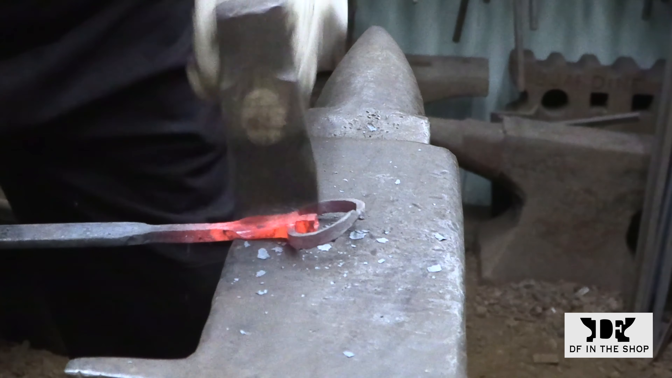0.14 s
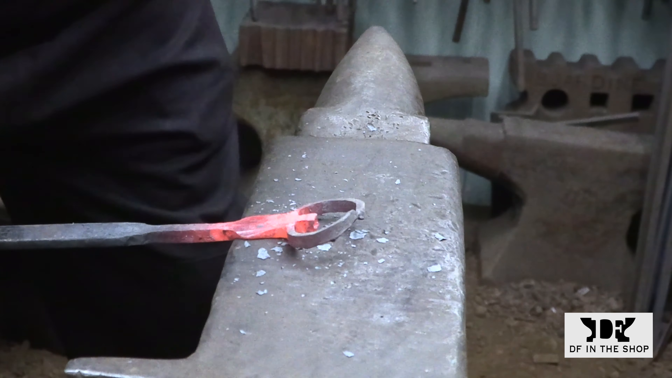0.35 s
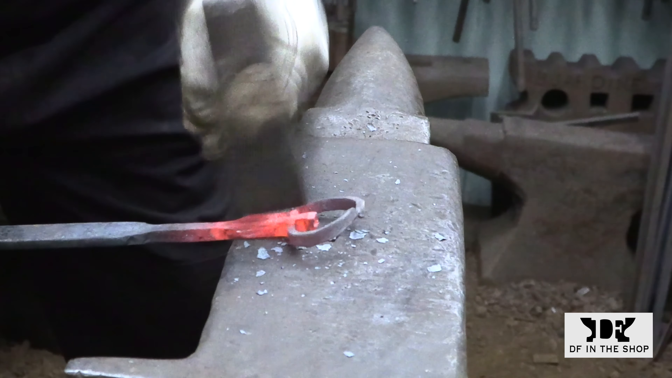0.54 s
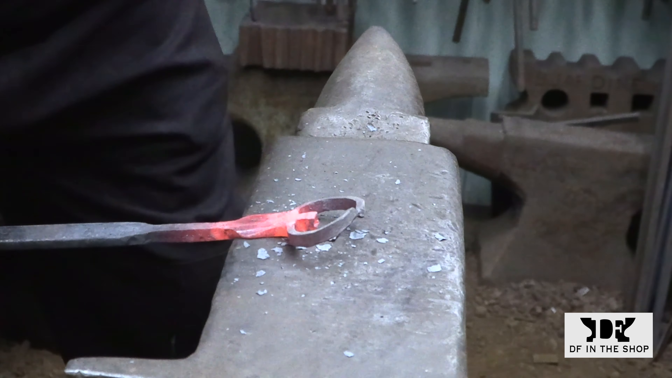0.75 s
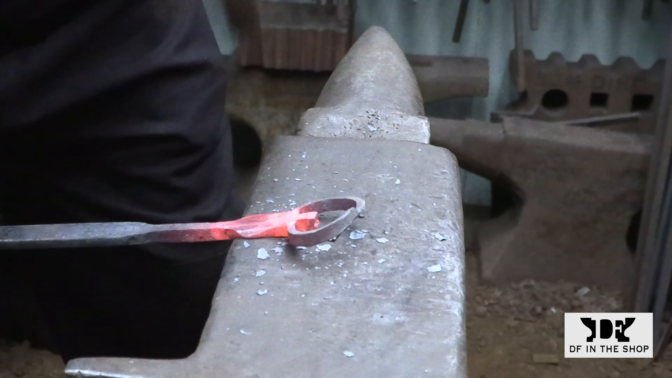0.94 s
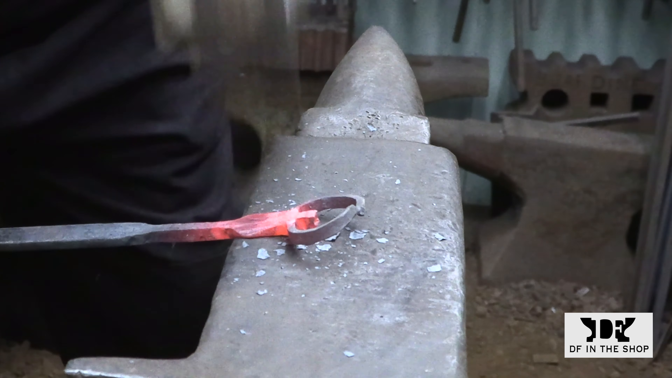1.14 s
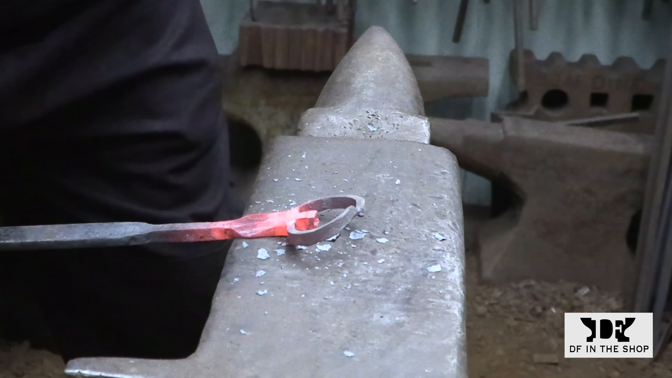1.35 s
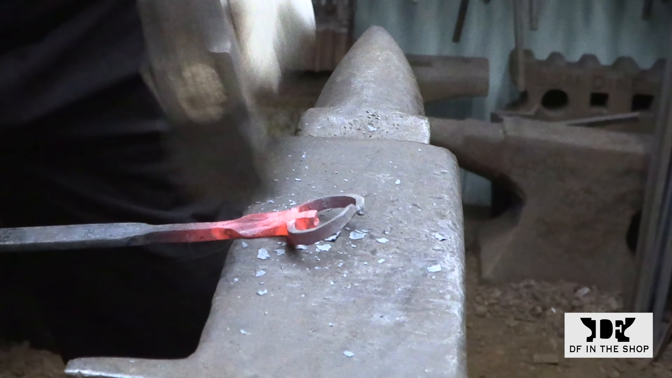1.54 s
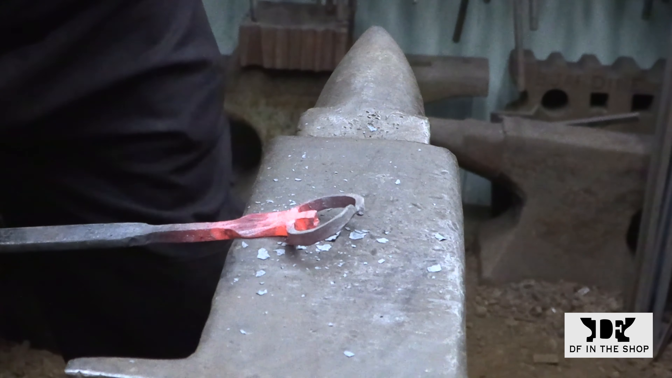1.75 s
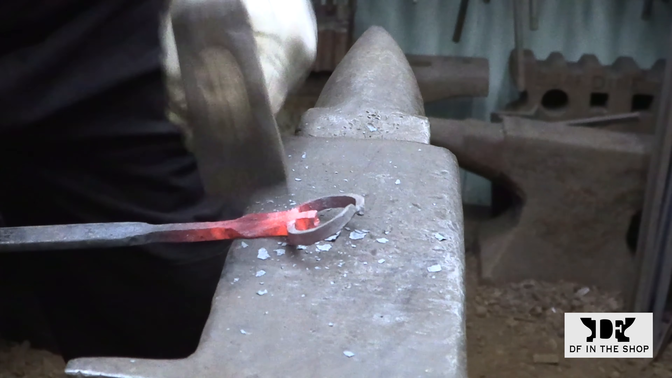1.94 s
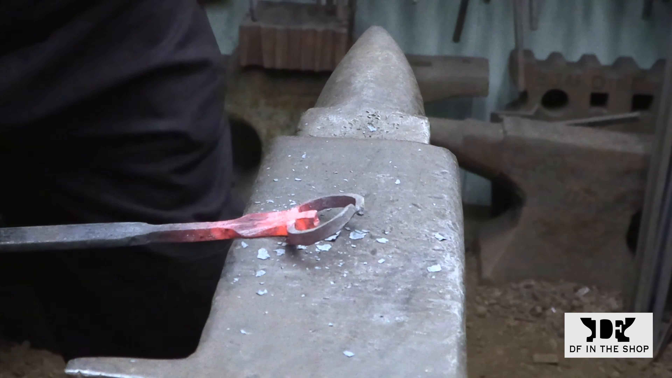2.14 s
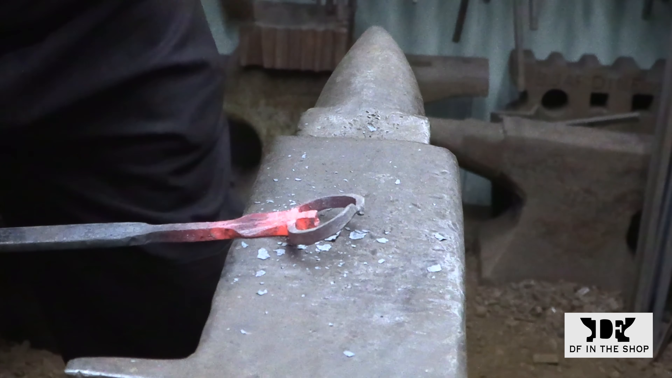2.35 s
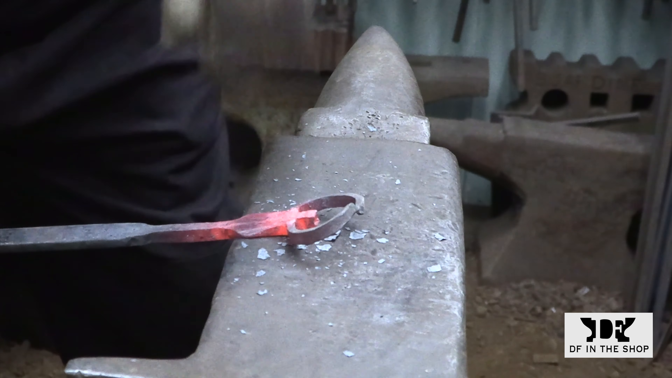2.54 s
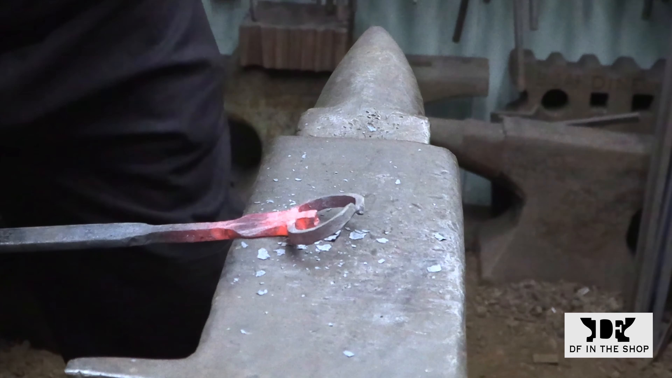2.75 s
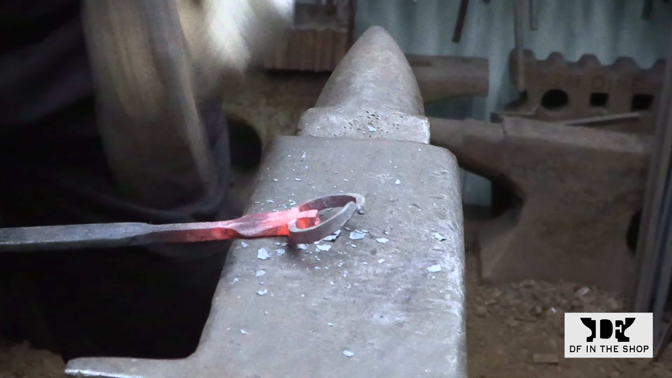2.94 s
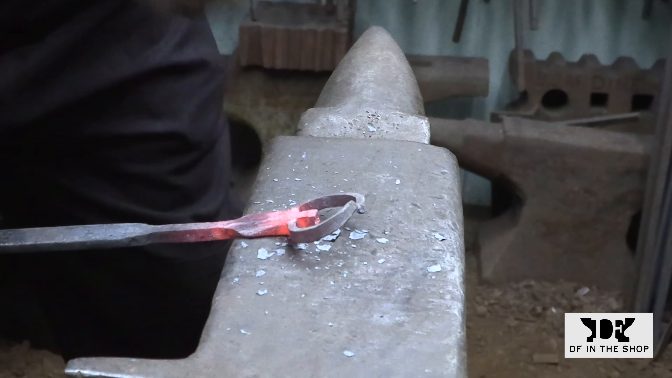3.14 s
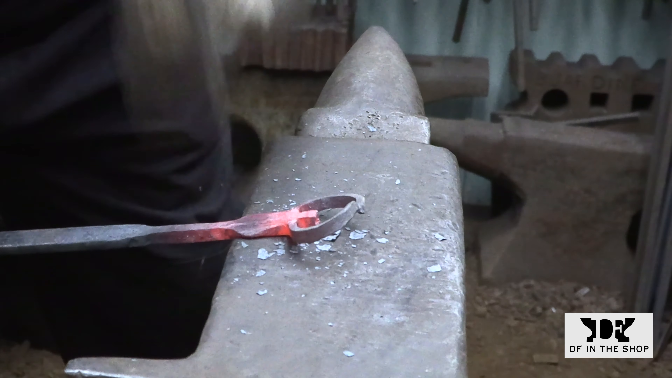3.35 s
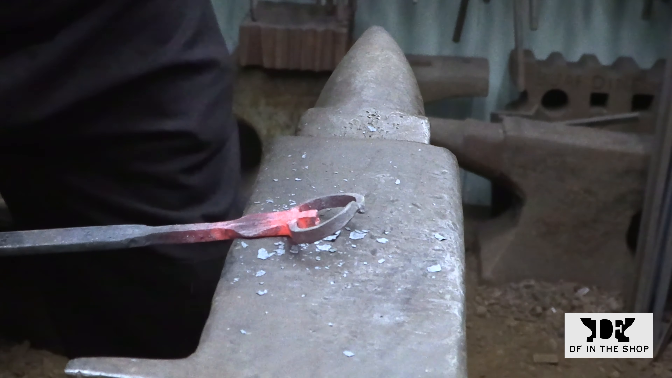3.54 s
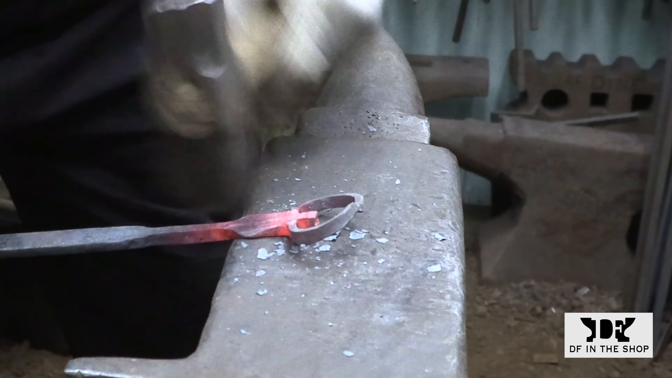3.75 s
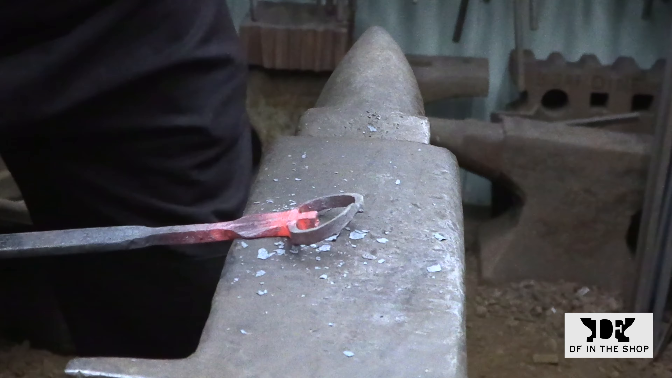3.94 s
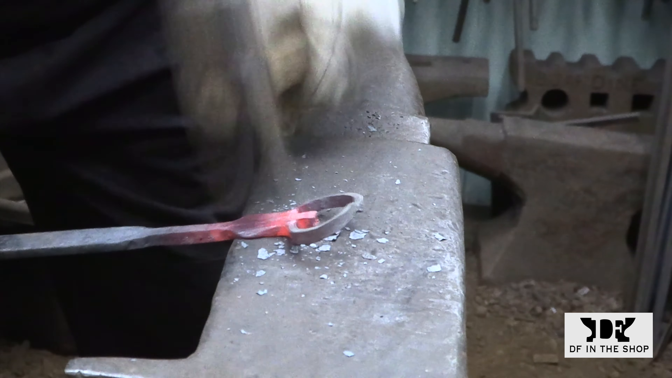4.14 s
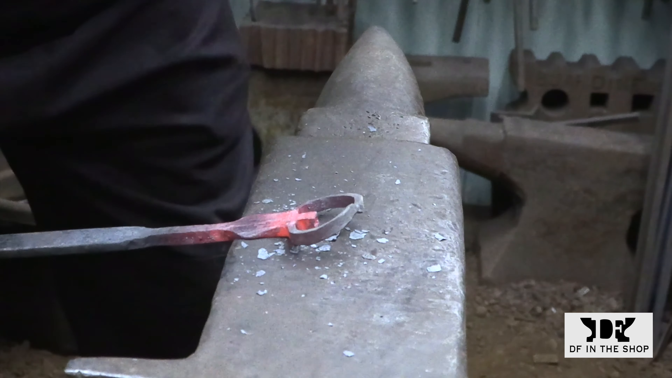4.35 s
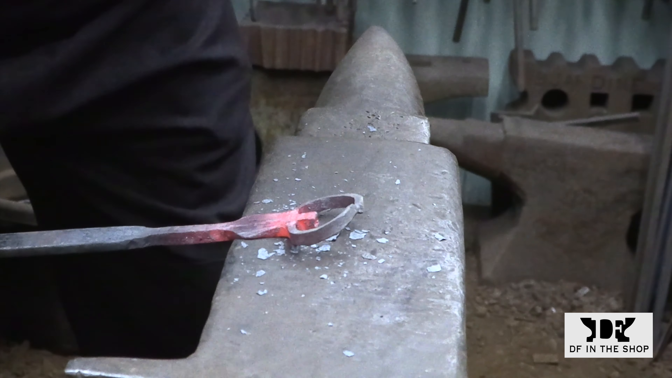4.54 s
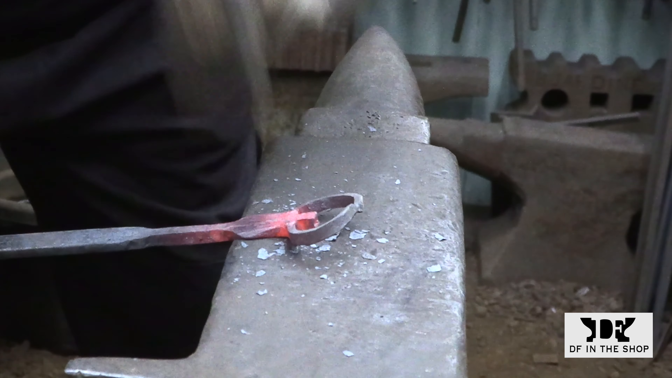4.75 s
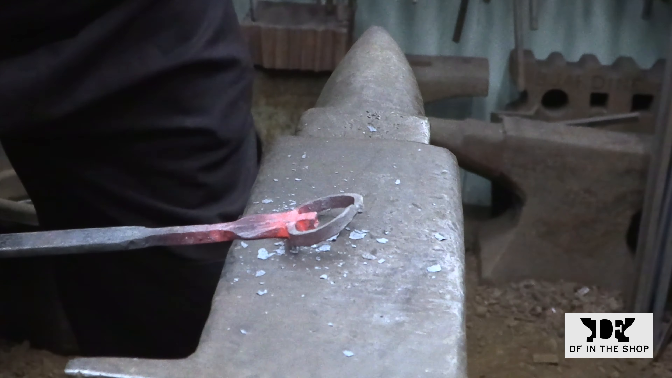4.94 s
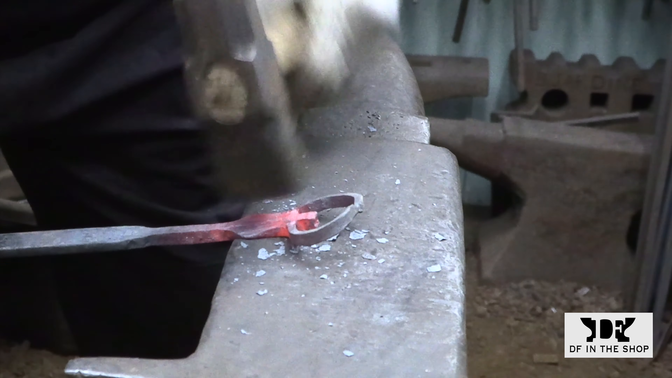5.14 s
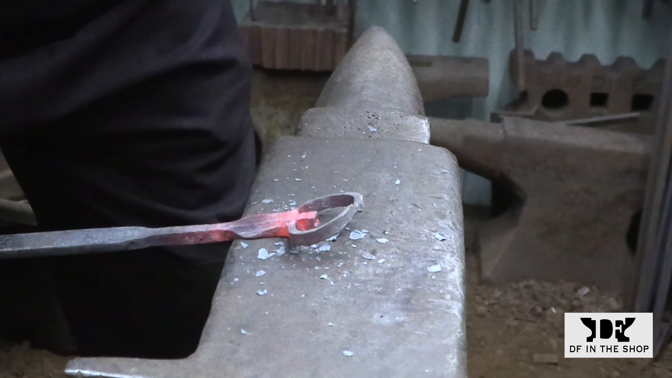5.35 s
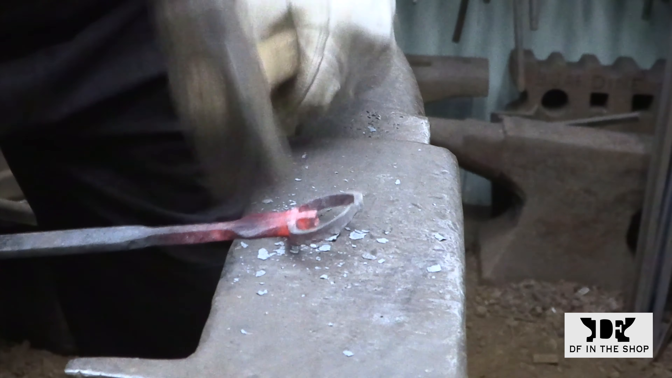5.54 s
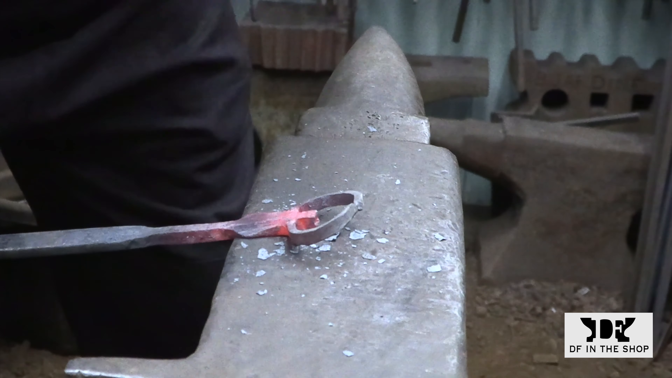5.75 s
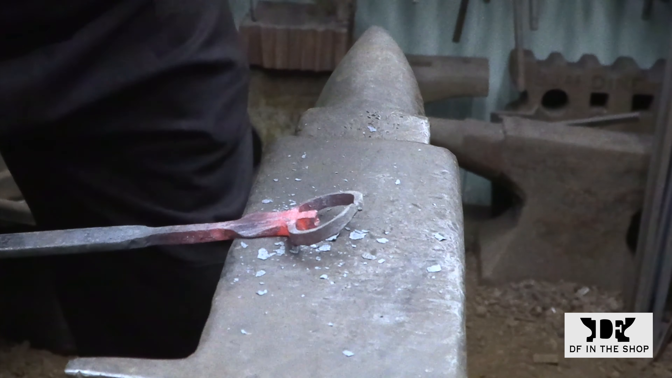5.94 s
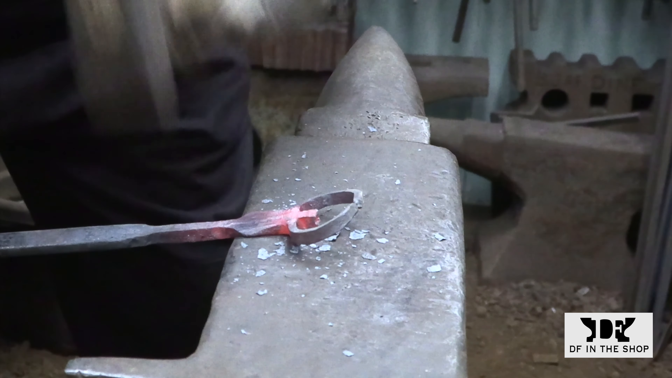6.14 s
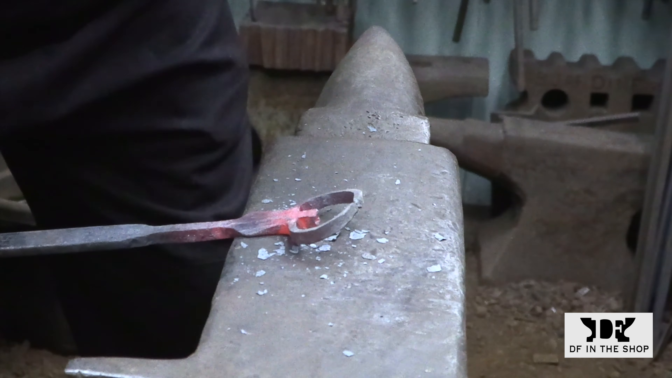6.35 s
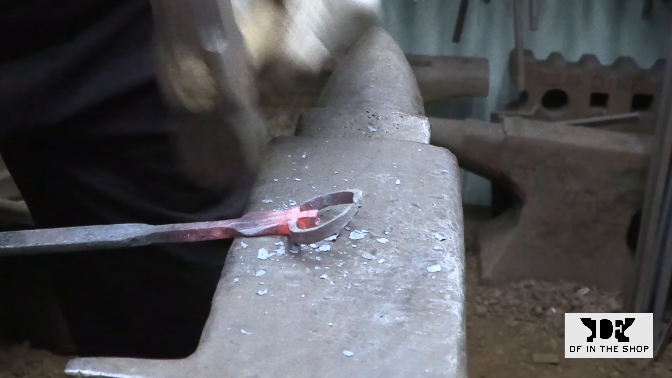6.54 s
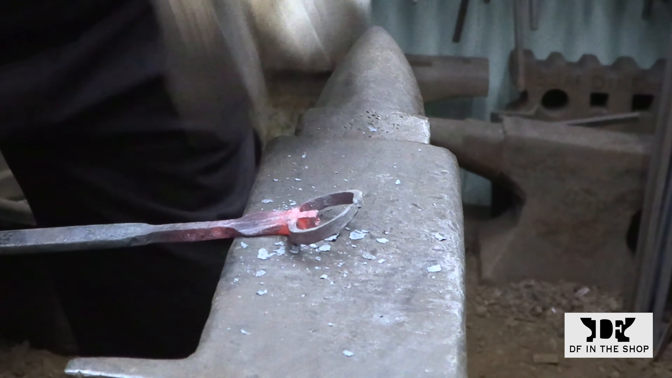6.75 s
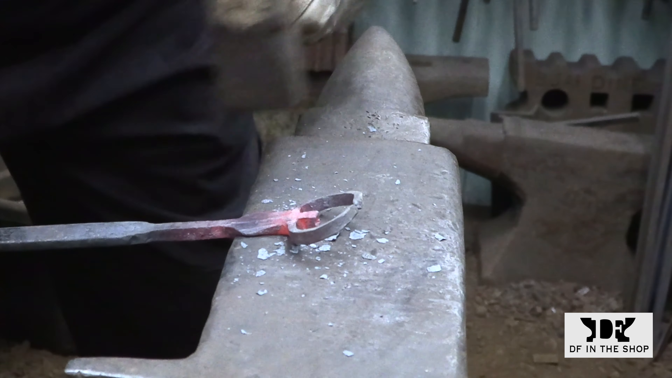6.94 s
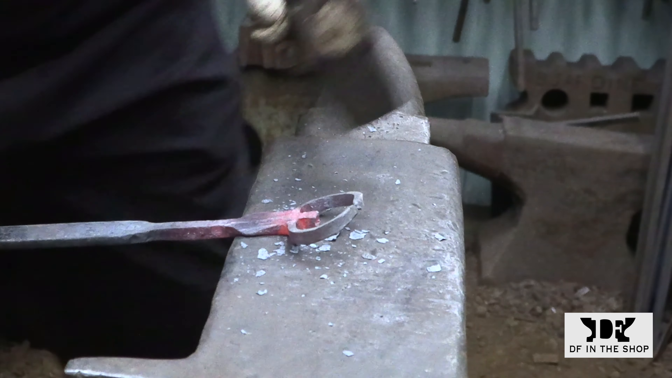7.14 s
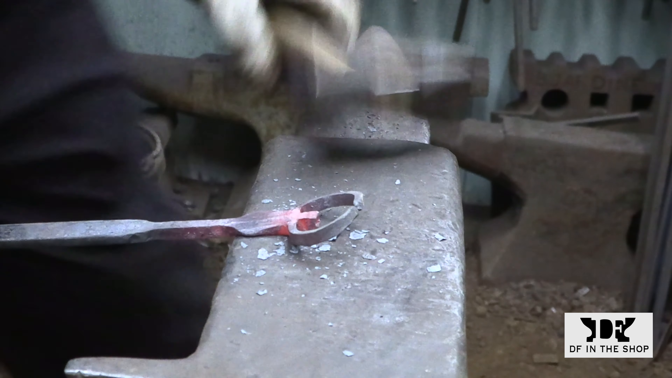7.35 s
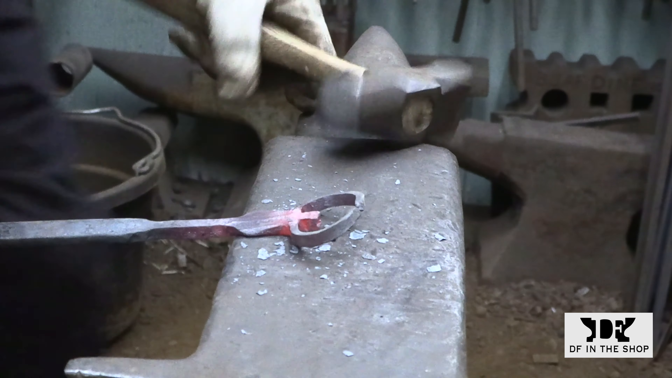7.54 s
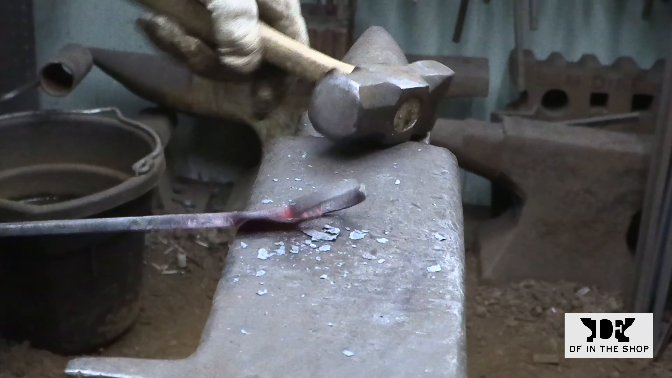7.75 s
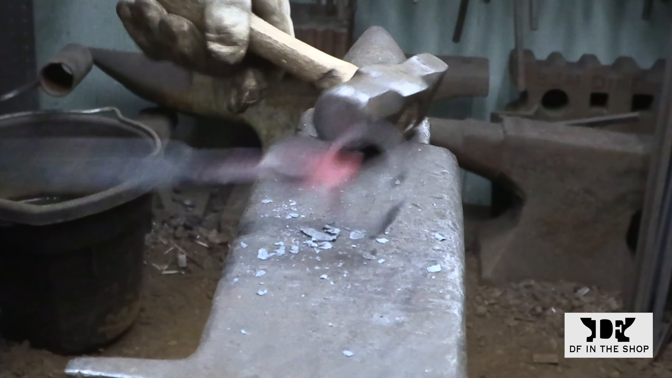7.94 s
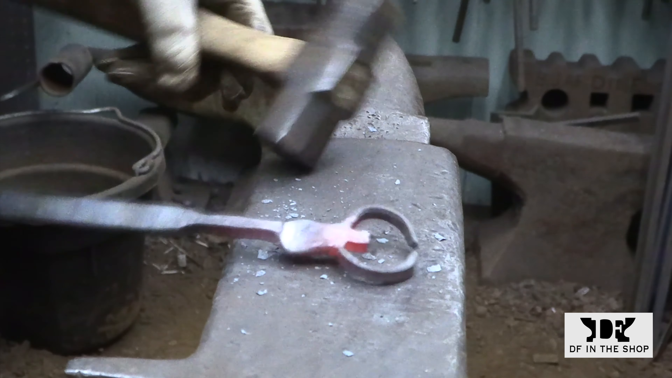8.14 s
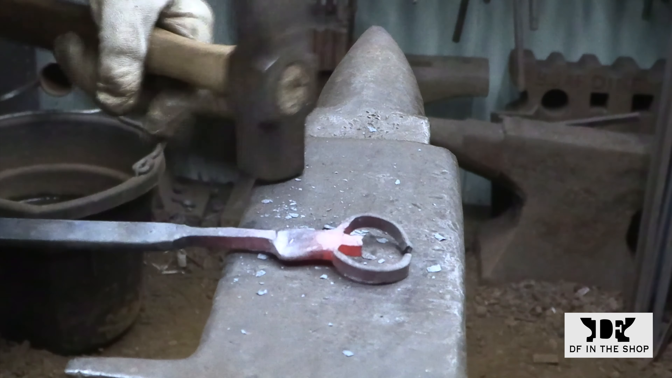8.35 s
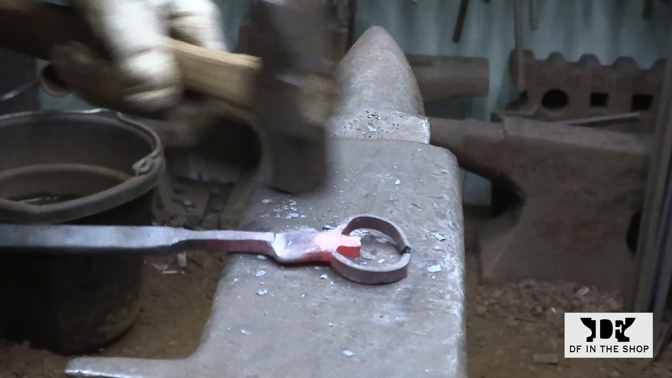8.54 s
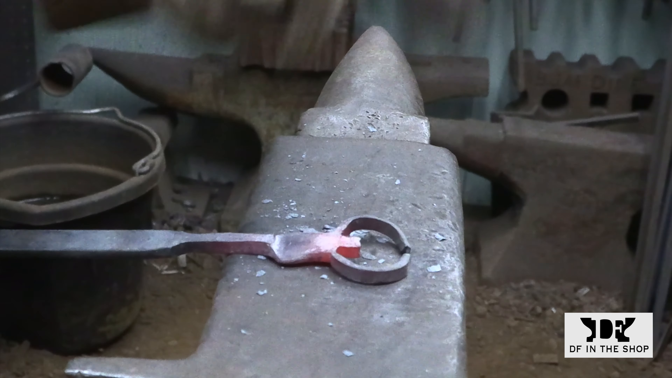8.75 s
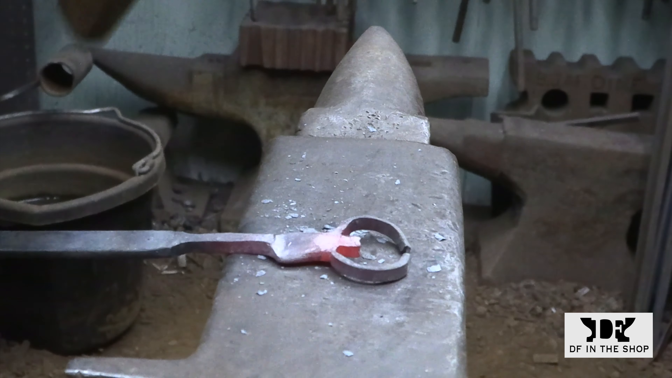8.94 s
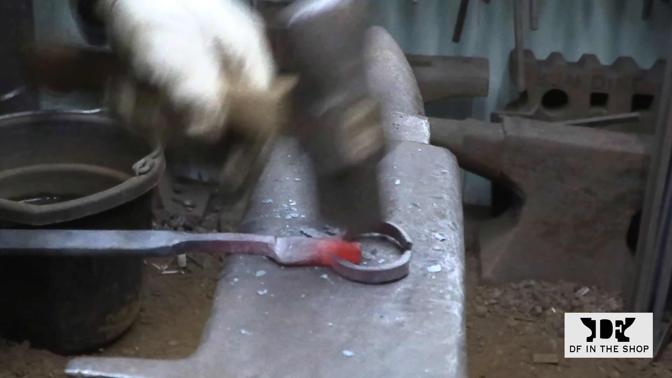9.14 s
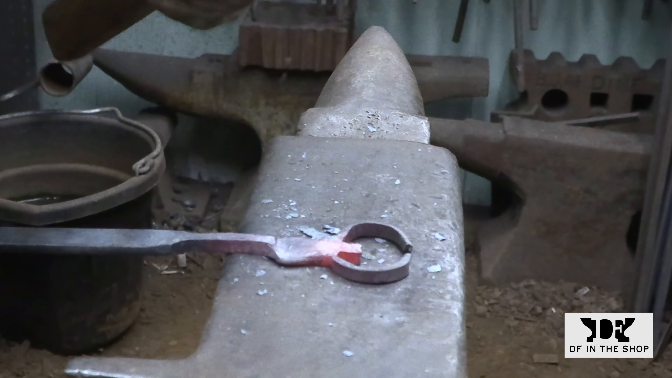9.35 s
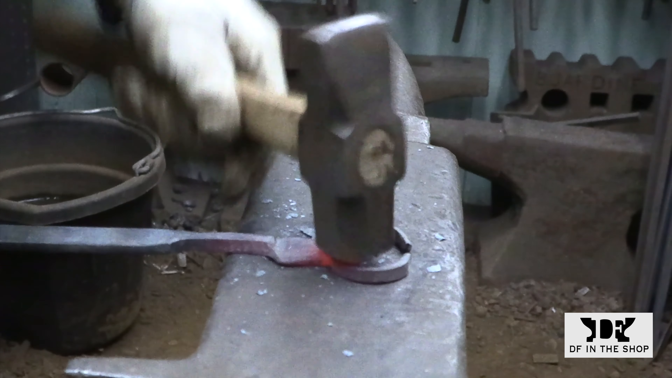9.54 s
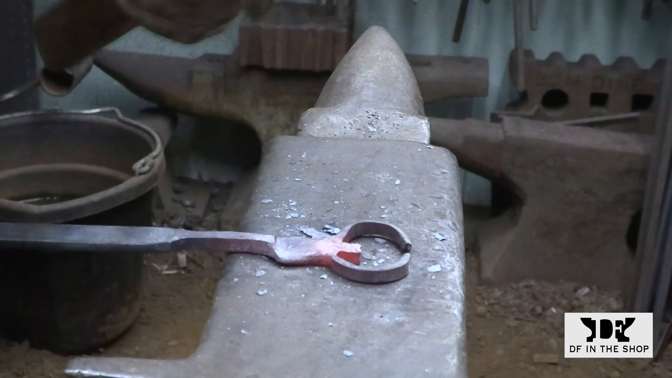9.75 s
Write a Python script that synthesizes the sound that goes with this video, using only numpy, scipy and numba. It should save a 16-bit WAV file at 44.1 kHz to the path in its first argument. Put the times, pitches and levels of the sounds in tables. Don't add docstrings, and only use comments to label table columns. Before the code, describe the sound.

A close stereo microphone in a small workshop hears a hand hammer forging hot steel on an anvil. From 0.1 s to about 6.5 s blows land steadily, nearly half a second apart: a hard crack, a quick wall slap, a short bright ring with a high steely whine, and a low stump thud. Each varies slightly in brightness; sleeves rustle softly between them over faint room air. Around 6.5-7.1 s the blows come quicker, weaker and duller. At 7.4 s the hammer drops on the bare face with a clearer clank, then rocks with two dull knocks near 7.6 s. From 7.7 to 8.4 s the bar slides, scrapes and clinks as it is turned, followed by faint shifting. A bright, noisy glancing blow lands at 9.2 s, small taps follow, then a full, thuddier strike at 9.55 s decays. Peaks are held level by gain control.

```python
import sys
import numpy as np
from scipy import signal
from scipy.io import wavfile
from scipy.ndimage import uniform_filter1d, minimum_filter1d, map_coordinates
from numba import njit

SR = 44100
rng = np.random.default_rng(int(sys.argv[2]) if len(sys.argv) > 2 else 0)


def persist_wave(psi):
    counts = np.round(np.clip(psi, -1, 1) * 32767).astype(np.int16)
    wavfile.write(sys.argv[1], SR, np.atleast_2d(counts).T)


def volts(x):
    e = np.asarray(x, float) / 20
    return 10 ** e


N = 431298
TAIL_N = int(.8 * SR)

# (frequency [Hz], density [dB per Hz])
AIR_COLOUR = [(15, -17.5), (25, -12), (124, 1), (237, -8.5), (314, -8), (386, -6), (979, -12), (1560, -8.5),
              (6620, -24.5), (7940, -22), (12000, -46), (15600, -62.5), (22000, -120)]
AIR_DB = -75
# (frequency [Hz], t60 [s])
ROOM_T60 = [(100, .3), (400, 0.23), (1500, 0.23), (4000, 0.22), (9000, 0.17), (15000, 0.067)]
# (delay [s], level [dB])
WALL_ECHOES = [(.0032, -39), (.0068, -38.5), (0.0131, -22), (0.0144, -1.5), (.019, 5.5), (0.0282, 10.5)]
# (frequency [Hz], correlation [0-1])
PORT_LIKENESS = [(60, .995), (300, .985), (1000, .9), (2500, .78), (6000, .62), (13000, .75)]
# (frequency [Hz], left minus right [dB])
PORT_BALANCE = [(60, -2), (240, -2), (950, -0.5), (3770, -1), (15000, 1)]
# (frequency [Hz], share [0-1])
ROOM_REPEAT = [(600, .7), (1500, .7), (4000, .5), (9000, .2)]
# (frequency [Hz], density [dB per Hz])
CRACK_COLOUR = [(82, -58), (140, -27.5), (450, -7), (800, -10.5), (1170, -8), (1600, -6.5), (2900, -6),
                (3700, -14), (5800, -17.5), (8150, -14.5), (10500, -28), (13000, -37), (15000, -43),
                (16200, -60.5)]

# (frequency [Hz], density [dB per Hz])
CLOTH_COLOUR = [(88, -41), (150, -21.5), (323, -22.5), (361, -5), (464, -8), (622, -11), (2920, -9),
                (4200, -21), (5460, -58), (9240, -120)]
# (frequency [Hz], density [dB per Hz])
HISS_COLOUR = [(2500, -31.5), (3600, -9), (5200, 0.5), (7600, -2), (9500, -8.5), (11500, -11.5),
               (13500, -30), (15000, -54.5)]
LIFTS_DB = [-72.5, -75.5, -74, -72, -80, -79, -75.5, -71.5, -71, -71, -72.5, -72, -76, -74.5, -74, -76]
# (middle [s], half length [s], level [dB], hiss over body [dB])
SLIDES = [
    (7.771, 0.078, -57.5, -12.5),
    (7.967, 0.12, -58, -13),
    (8.24, 0.049, -49.5, -12),
    (8.347, 0.048, -68.5, -6),
    (8.61, 0.3, -66.5, -8.5),
    (8.845, 0.084, -74.5, -6),
    (9.018, 0.1, -76, -5.5),
    (9.15, 0.041, -66, -11),
    (9.469, 0.075, -65.5, -8.5),
]
LIFT_MIDDLE, LIFT_HALF = .76, .17
LIFT_HISS_DB, HISS_DB_PER_DB = -6.5, 0.19
SWELL_POWER = 2.6

# (time [s], strength [dB], tone [dB], treble [dB], bass [dB])
TAPS = [(7.391, -42, -10, -12, 2), (7.741, -40, -13, -13, 55), (7.753, -41, -2.5, -13, 18),
        (7.865, -36, 8, -7, -22), (8.096, -30.5, -3.5, -19, 0), (8.138, -29.5, -5.5, -17, 0),
        (8.182, -28.5, -0.5, 8, -9), (8.246, -38, -12, 3, 12), (8.382, -48.5, -12, -9, 19),
        (8.801, -44, -10, -17, 0), (9.426, -57, -5, 13, 15), (9.474, -49.5, -21, -4, -6)]
RING_SHARE, CLANG_SHARE = 0.36, 1
# (level [dB], t60 [s])
BAR_HZ = [415, 732, 1136, 1556, 2040, 2460, 3305, 4124, 4845, 5572, 6315, 7212, 7946, 2869]
BAR_MODES = [(-4, 0.3), (-6.5, 0.2), (3, 0.28), (4, 0.44), (6, 0.3), (-2.5, 0.3), (0.5, 0.15), (-6.5, 0.2),
             (-15, 0.2), (-7, 0.27), (-10, 0.13), (-7.5, 0.24), (-10.5, 0.22), (-2, 0.25)]

# (time [s], strength [dB], tone [dB], bass [dB])
ROCKS = [
    (7.595, -29, 2, 6),
    (7.627, -30, 5, 6),
]
# (level [dB], t60 [s])
SIDE_HZ = [415, 732, 1001, 1130, 1556, 2460, 2966, 3714]
SIDE_MODES = [(-4, .25), (-7, .22), (-10, .3), (-1, .33), (-10, .4), (2, .33), (-8, .17), (-13, .3)]

# (time [s], strength [dB], ring [dB], clang [dB], bass [dB])
DROPS = [
    (7.424, -13, 4, -3, -5.5),
]
# (level [dB], t60 [s])
BARE_HZ = [1556, 2433, 3133, 3714, 4070, 5566, 6298, 7456, 7941, 8441, 10940, 14160, 12500]
BARE_MODES = [(0, 0.27), (2, 0.27), (-8, 0.2), (-10, 0.32), (-14, 0.22), (-4, 0.18), (-13, .24), (-5, 0.13),
              (-19, 0.32), (-27, 0.3), (-19, 0.29), (-21, 0.2), (-24, .25)]

# (time [s], strength [dB], ring [dB], clang [dB], bass [dB])
GLANCES = [
    (9.175, -17, -5, -9.5, 9),
]
# (level [dB], t60 [s])
RIM_HZ = [576, 2374, 2826, 3235, 4517, 5782, 6277, 6815, 7337, 7941, 8506]
RIM_MODES = [(1, 0.29), (-12, 0.18), (-8.5, .2), (-4, 0.2), (-8, 0.16), (5.5, 0.11), (-10, 0.22), (-6, .18),
             (-3.5, 0.14), (-5, .32), (-16, 0.14)]

# (time [s], strength [dB], hammer ring [dB], heel chime [dB], brightness [dB])
BLOWS = [(0.123, -20, -1, 8.5, -3), (0.594, -19, -4, 11.5, -0.5), (1.058, -19.5, -4.5, 11, -2.5),
         (1.531, -19, 3, 2, 5), (1.991, -18, -6.5, 4.5, 11.5), (2.464, -19, -1, 9.5, 1.5),
         (2.904, -22, 1.5, -1, 5.5), (3.289, -23, -11.5, 8, 9.5), (3.73, -22, 1, -0.8, 9),
         (4.215, -18, -4, 7.5, 6.5), (4.679, -18, 2.5, 3.5, 3), (5.144, -18, 5.5, 1.5, -0.2),
         (5.605, -19.5, 3.5, 2, 3.5), (6.065, -20, -2, 1.5, 7.5), (6.52, -23.5, -14, -4, 3),
         (6.859, -22.5, -11, -18, -12), (7.133, -27.5, -18.5, 5.5, -31), (9.552, -19, -7, 3, 1.5)]
# (level [dB], t60 [s])
STUMP_HZ = [54, 61, 75, 116, 132, 152, 188, 252, 312, 330, 382, 445, 577]
STUMP_MODES = [(-49, 0.3), (-47.5, 0.63), (-52, 0.57), (-52, 0.54), (-51, 0.73), (-42, 0.33), (-49.5, 0.39),
               (-44.5, 0.11), (-50.5, 1.2), (-29.5, 0.33), (-24, 0.085), (-23.5, 0.26), (-31.5, 0.3)]
# (level [dB], t60 [s])
ANVIL_HZ = [801, 1547, 1558, 2062, 2509, 2835, 3243, 3716, 1562]
ANVIL_MODES = [(-22, 0.35), (3.5, 0.19), (0, 0.16), (-25, 0.32), (-23, 0.33), (-29, .17), (-18.5, 0.28),
               (-28.5, 0.15), (-31, 0.41)]
# (level [dB], t60 [s])
WALL_HZ = [797, 864, 1330, 1754, 1905, 2050, 2320, 2432, 2940, 3290, 470]
WALL_MODES = [(-13, .2), (-15, .18), (-17, .18), (-14, .18), (-16, .18), (-12, .18), (-16, .17), (-15, .17),
              (-12, .16), (-12, .15), (-11, .15)]
# (level [dB], t60 [s])
HEAD_HZ = [7941]
HEAD_MODES = [(-9, 0.37)]
# (level [dB], t60 [s])
HEEL_HZ = [6245, 10930, 14150]
HEEL_MODES = [(-22, 0.24), (-27.5, .24), (-38.5, .13)]
# (level [dB], t60 [s])
FACE_HZ = [9300, 7455, 9370, 11330, 12470, 13000, 9440]
FACE_MODES = [(-16, .13), (-29, .16), (-14, 0.16), (-40, .14), (-38, .13), (-42, .12), (-17, .13)]
ANVIL_DB = 3
FACE_SHARE, MID_SHARE = -0.13, .12
SCALE_DB, SCALE_T60_S = -30, .15
TURNED_S, TURNED_THUD_DB = 8, 1.5
COOL_HZ, COOL_DB, COOL_DB_PER_S, COOL_T60_S = 5570, -33, 2.5, .2


def along(points, hz):
    f, v = np.transpose(points)
    return np.interp(np.log(hz + 1), np.log(f + 1), v)


def unit(x):
    return x / np.sqrt(np.mean(x ** 2) + 1e-20)


def spread(count, gain, alike=0.99, walls=None):
    hz, t, z = signal.stft(rng.standard_normal((2, count)), SR, nperseg=512)
    if walls is not None:
        same = along(ROOM_REPEAT, hz)[:, None]
        z = same * signal.stft(walls, nperseg=512)[2] + np.sqrt(1 - same ** 2) * z
    turn = np.arccos(np.clip(alike * along(PORT_LIKENESS, hz), -1, 1))[:, None] / 2
    mid, side = z[0] * np.cos(turn), z[1] * np.sin(turn)
    lean = volts(along(PORT_BALANCE, hz) / 2)[:, None]
    pair = np.array([(mid + side) * lean, (mid - side) / lean]) * gain(hz[:, None], t)
    return signal.istft(pair, SR, nperseg=512)[1][:, :count]


def ringing(pitches_hz, modes, attack_s, flutter_db):
    hz = np.array(pitches_hz)[:, None]
    db, t60 = np.transpose(modes)[:, :, None]
    t = np.arange(TAIL_N) / SR
    level, skew, turn = rng.standard_normal((3, len(hz), 1))
    knots = rng.standard_normal((len(hz), 48))
    flutter = np.array([np.interp(t, np.linspace(0, TAIL_N / SR, len(k)), k) for k in knots])
    apart = np.clip(hz / 9000, 0, 1)
    fade = volts(db + apart * level + flutter_db * flutter - 60 * t / t60) * (1 - np.exp(-t / attack_s))
    start = np.pi * np.arange(len(hz))[:, None] + flutter_db / 10 * flutter[::-1]

    def port(side):
        balance = volts(side * (apart * skew - .2))
        lag = side * (.45 + .2 * turn) * apart
        return np.sum(fade * balance * np.sin(2 * np.pi * hz * t + start + lag), axis=0)

    return np.array([port(1), port(-1)])


def burst(treble_db, top_db, bass_db, snap_db, walls=None):
    thin_db = min(bass_db, 0)
    tilt = [(300, bass_db), (900, .6 * thin_db), (2200, .35 * thin_db), (3000, 0.016),
            (6000, treble_db), (9000, treble_db), (11500, top_db)]

    def gain(hz, t):
        return volts(along(CRACK_COLOUR, hz) + along(tilt, hz) - 60 * t / along(ROOM_T60, hz))

    tail = spread(TAIL_N, gain, walls=walls)
    tail = tail / np.sqrt(np.mean(tail[:, :SR // 50] ** 2))
    t = np.arange(TAIL_N) / SR
    echoes = sum((t >= s) * volts(db - 60 * np.abs(t - s) / 0.0014) for s, db in WALL_ECHOES)
    echoes = uniform_filter1d(uniform_filter1d(echoes, size=25), size=25)
    fill = 1 - np.exp(-t / .004)
    contact = volts(-4.8 - 60 * t / 0.0056)
    shaped = tail * (fill + volts(snap_db) * (contact + 1.4 * echoes))
    shaped = shaped * (1 - np.exp(-(t / .0004) ** 2))
    no_bass = signal.butter(3, 130, "highpass", fs=SR, output="sos")
    return signal.sosfilt(no_bass, shaped)


def strokes(table, stroke):
    out = np.zeros((2, N + TAIL_N))
    for s, db, *colour in table:
        out[:, round(s * SR):][:, :TAIL_N] += volts(db) * stroke(s, *colour)
    return out[:, :N]


def room_air():
    return volts(AIR_DB) * unit(spread(N, lambda hz, _: volts(along(AIR_COLOUR, hz))))


def rustle():
    t = np.arange(N) / SR
    times = np.transpose(BLOWS)[0]
    swells = []
    for blow, gap, db in zip(times, np.diff(times), LIFTS_DB):
        hiss_db = LIFT_HISS_DB + HISS_DB_PER_DB * (db - max(LIFTS_DB))
        swells.append((blow + LIFT_MIDDLE * gap, LIFT_HALF * gap, db, hiss_db))
    gains = np.zeros((2, N))
    for s, half, db, hiss_db in swells + list(SLIDES):
        gains += volts([[db], [db + hiss_db]]) * np.exp(-np.abs((t - s) / half) ** SWELL_POWER)
    grain_knots = rng.standard_normal(N // 200 + 4)
    grain = volts(2.3 * map_coordinates(grain_knots, [np.arange(N) / 200]))
    body = unit(spread(N, lambda hz, _: volts(along(CLOTH_COLOUR, hz)), alike=0.89))
    hiss = unit(grain * spread(N, lambda hz, _: volts(along(HISS_COLOUR, hz)), alike=0.84))
    return gains[0] * body + gains[1] * hiss


def knock(pitches_hz, modes, ring_db, clang_db, treble_db, top_db, bass_db):
    levels = [(db + (clang_db if hz < 2700 else ring_db), t60) for hz, (db, t60) in zip(pitches_hz, modes)]
    tones = ringing(pitches_hz, levels, attack_s=.002, flutter_db=3)
    return burst(treble_db, top_db, bass_db, snap_db=3.5) + volts(-5.0) * tones


def tap(s, tone_db, treble_db, bass_db):
    ring_db = tone_db + RING_SHARE * treble_db
    clang_db = tone_db + CLANG_SHARE * min(bass_db, 0)
    return knock(BAR_HZ, BAR_MODES, ring_db, clang_db, treble_db, treble_db, bass_db)


def rock(s, tone_db, bass_db):
    return knock(SIDE_HZ, SIDE_MODES, tone_db, tone_db, treble_db=-46, top_db=-38, bass_db=bass_db)


def stump(count=13):
    return ringing(STUMP_HZ[:count], STUMP_MODES[:count], attack_s=0.002, flutter_db=2.0)


def scale(count=18):
    place, size, life = rng.random((3, count))
    modes = np.transpose([SCALE_DB + 9 * size - 14 * place, SCALE_T60_S * (.7 + .7 * life)])
    return ringing(8500 + 6300 * place, modes, attack_s=.002, flutter_db=2)


def drop(s, ring_db, clang_db, bass_db):
    hit = knock(BARE_HZ, BARE_MODES, ring_db, clang_db, treble_db=5.5, top_db=-11.5, bass_db=bass_db)
    return hit + volts(bass_db + 5.0) * stump(count=8)


def glance(s, ring_db, clang_db, bass_db):
    hit = knock(RIM_HZ, RIM_MODES, ring_db, clang_db, treble_db=10, top_db=2, bass_db=bass_db)
    return hit + volts(5) * scale() + volts(bass_db + 7) * stump(count=8)


def forging(walls, s, ring_db, chime_db, bright_db):
    body = volts(ANVIL_DB) * ringing(ANVIL_HZ, ANVIL_MODES, attack_s=.04, flutter_db=1.2)
    sheets = ringing(WALL_HZ, WALL_MODES, attack_s=.006, flutter_db=3)
    head = volts(ring_db) * ringing(HEAD_HZ, HEAD_MODES, attack_s=.006, flutter_db=1.5)
    heel = volts(chime_db) * ringing(HEEL_HZ, HEEL_MODES, attack_s=.005, flutter_db=3)
    face_db = FACE_SHARE * bright_db + 2.5 * rng.standard_normal()
    face = volts(face_db) * ringing(FACE_HZ, FACE_MODES, attack_s=.003, flutter_db=3)
    cooling = [(COOL_DB + COOL_DB_PER_S * s, COOL_T60_S)]
    bar = (s < TURNED_S) * ringing([COOL_HZ], cooling, attack_s=.003, flutter_db=4.5)
    crack = burst(MID_SHARE * bright_db, bright_db, 0, snap_db=7, walls=walls)
    partials = volts(bright_db) * scale()
    thud = volts(7.5 + TURNED_THUD_DB * (s > TURNED_S)) * stump()
    return volts(5.5) * (crack + body + sheets + head + heel + face + bar + partials + thud)


def scene():
    walls = rng.standard_normal((2, TAIL_N))
    air = room_air()
    blows = strokes(BLOWS, lambda *colour: forging(walls, *colour))
    earlier = volts(-4.0) * stump()[:, int(.35 * SR):]
    blows[:, :earlier.shape[1]] += earlier
    handling = volts(-9.5) * (strokes(TAPS, tap) + strokes(ROCKS, rock))
    return air + rustle() + handling + strokes(DROPS, drop) + strokes(GLANCES, glance) + blows


@njit
def follow(size, rise, fall):
    out, level = np.empty_like(size), 0.0
    for i in range(len(size)):
        level += (rise if size[i] > level else fall) * (size[i] - level)
        out[i] = level
    return out


def low_pass(x):
    return signal.sosfilt(signal.butter(12, 16650, fs=SR, output="sos"), x)


def record(dry):
    level = follow(np.abs(dry).max(axis=0), 1 / (.0002 * SR), 1 / (.02 * SR))
    gain = (1 + (level / volts(-17.5)) ** 4) ** (-.82 / 4)
    gain = uniform_filter1d(minimum_filter1d(gain, size=45), size=45)
    band = signal.butter(5, [40, 15300], "bandpass", fs=SR, output="sos")
    mix = signal.sosfilt(band, dry * gain)
    return low_pass(mix)


dry = scene()
out = record(dry)
persist_wave(out)
```